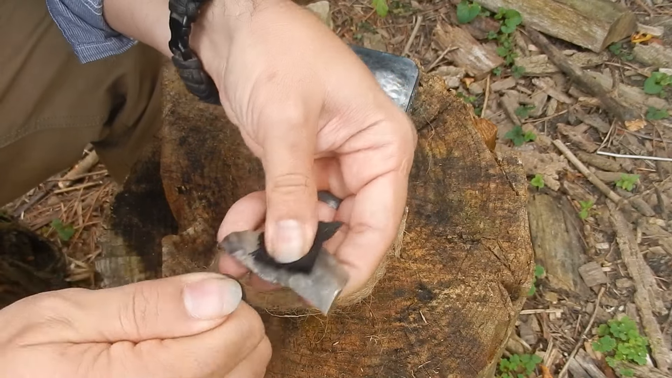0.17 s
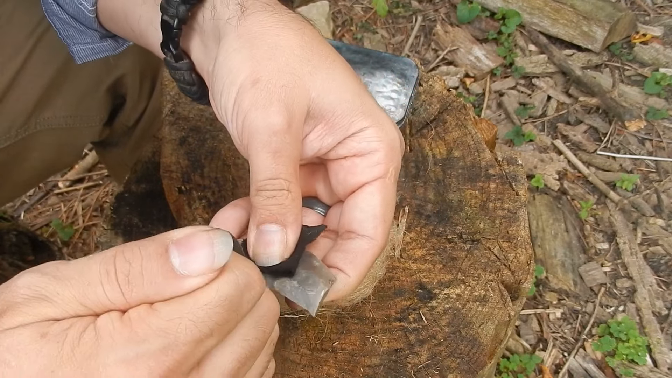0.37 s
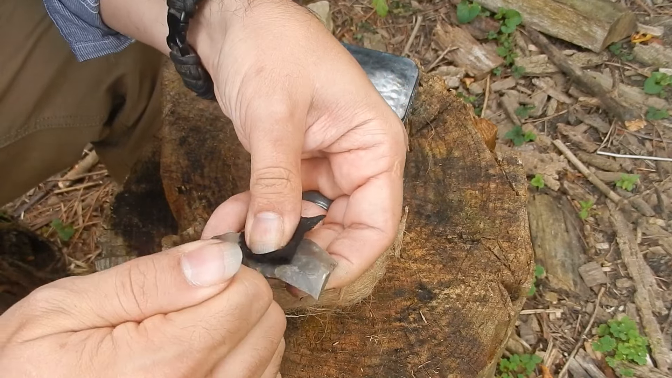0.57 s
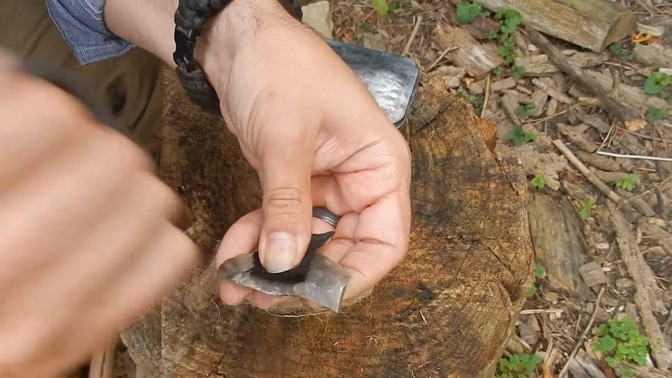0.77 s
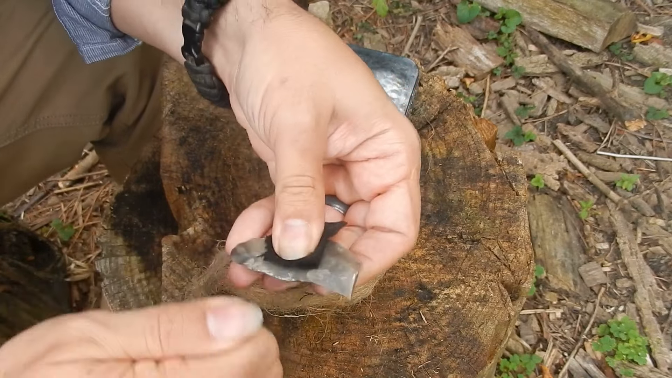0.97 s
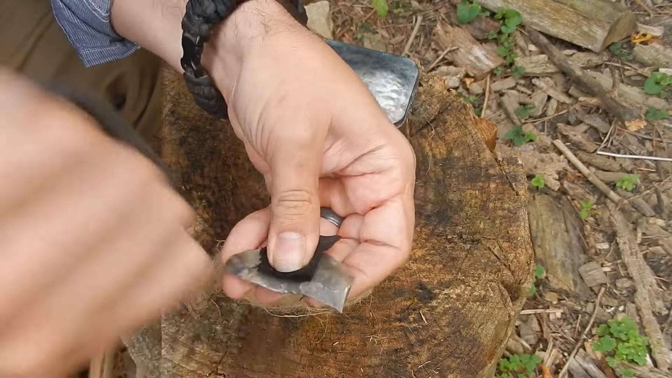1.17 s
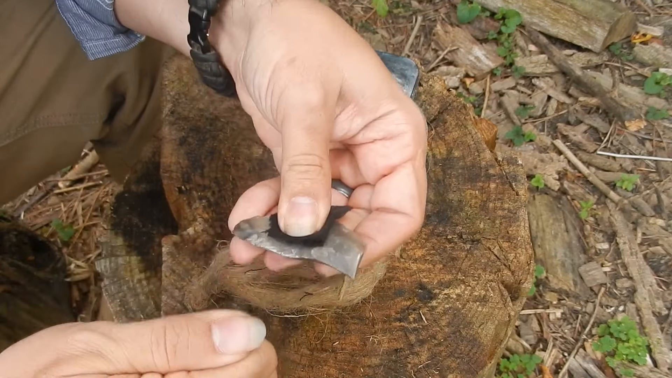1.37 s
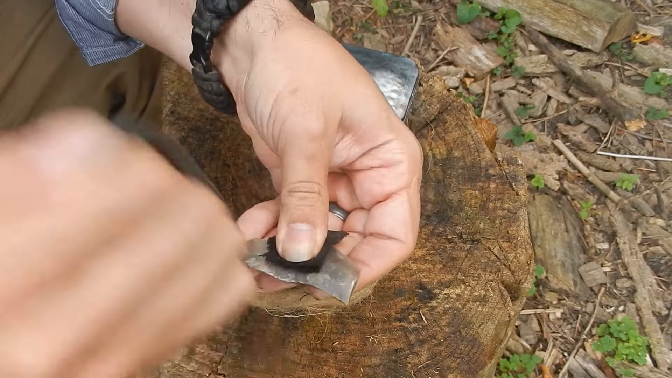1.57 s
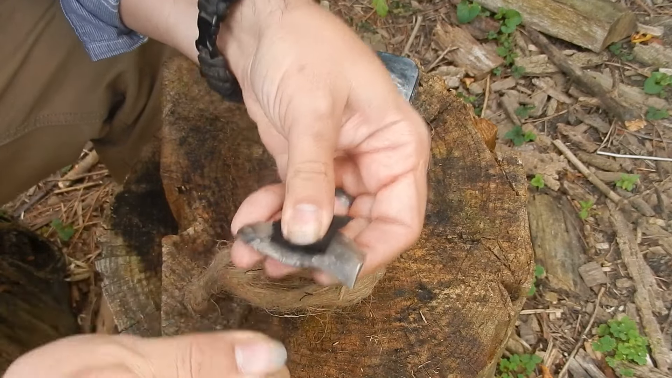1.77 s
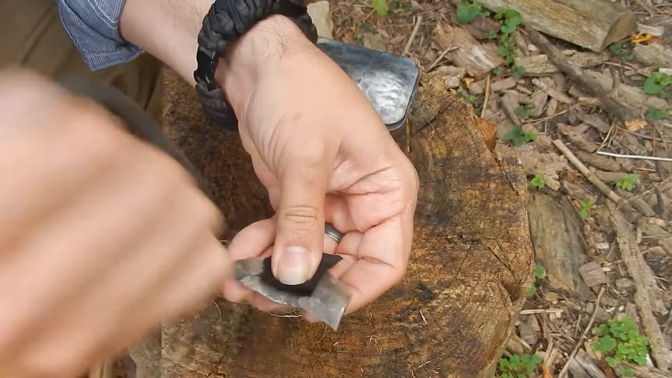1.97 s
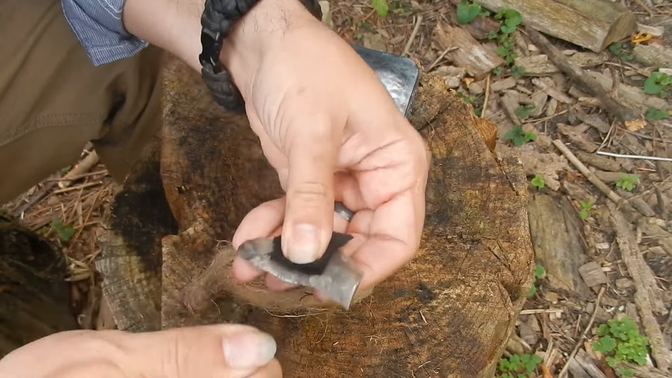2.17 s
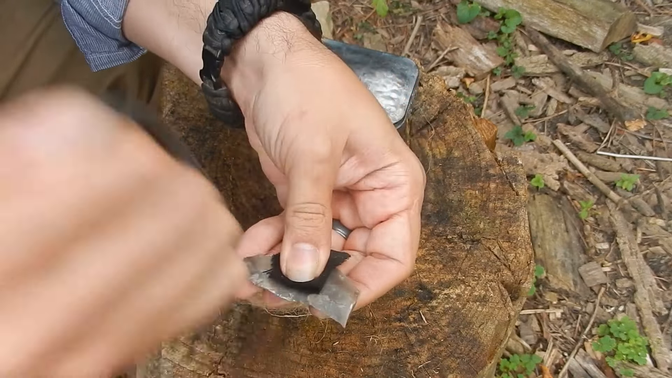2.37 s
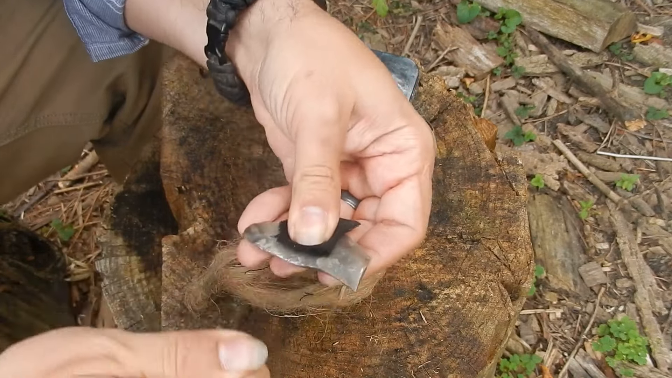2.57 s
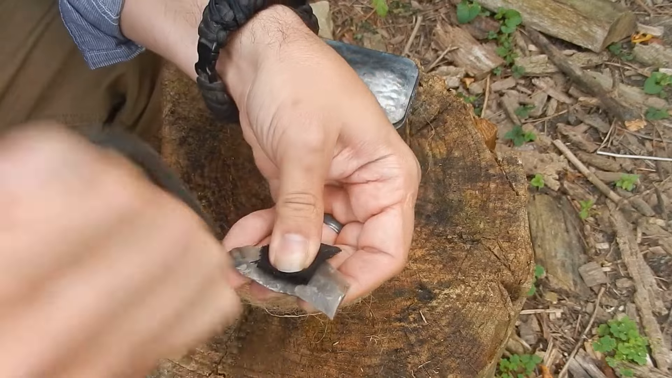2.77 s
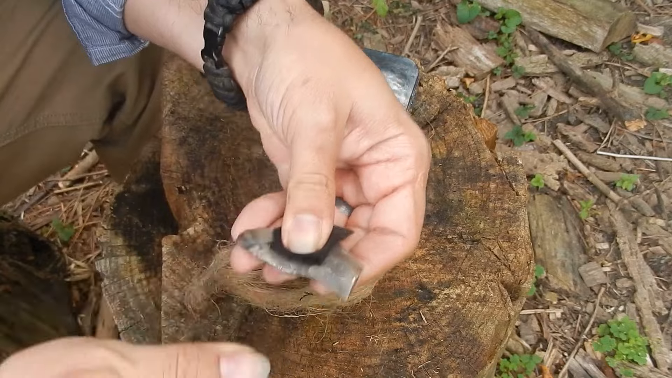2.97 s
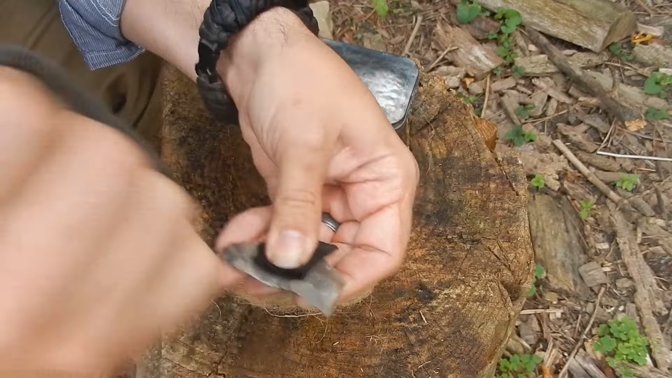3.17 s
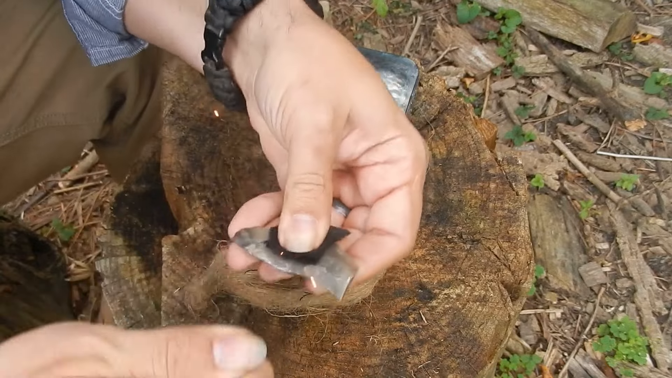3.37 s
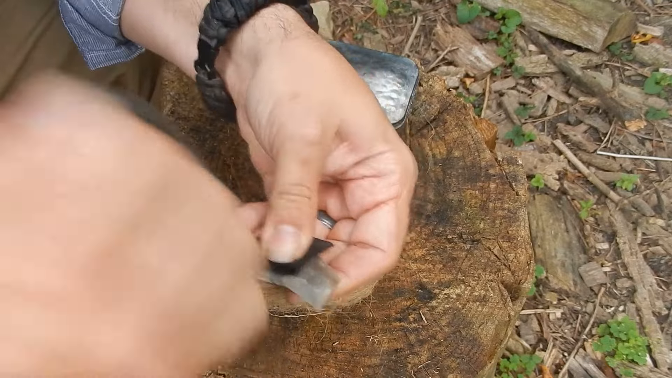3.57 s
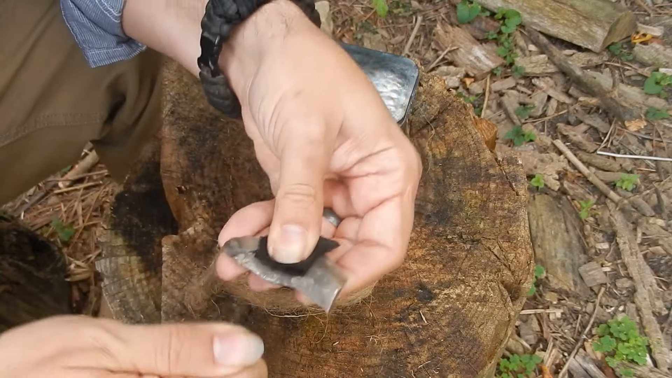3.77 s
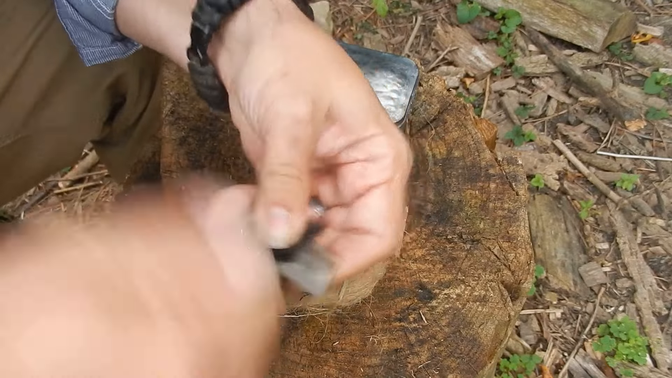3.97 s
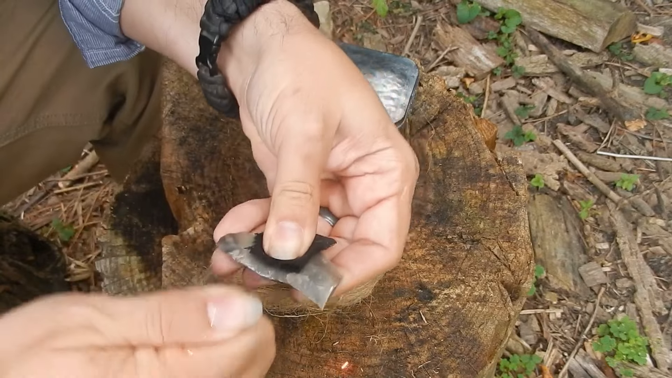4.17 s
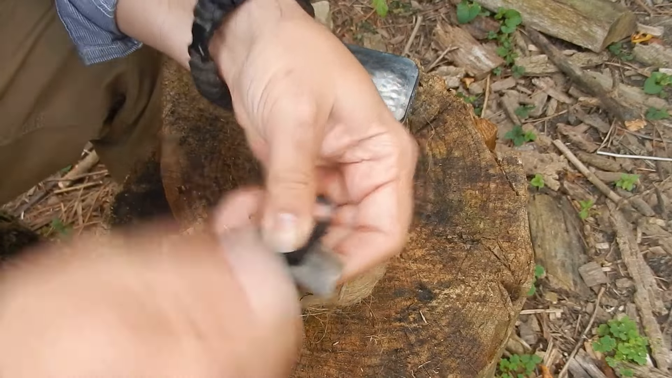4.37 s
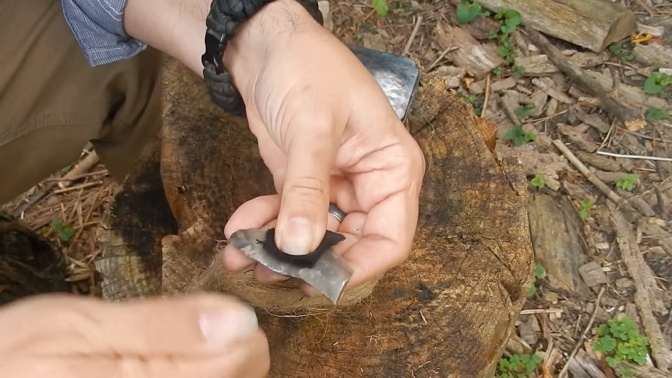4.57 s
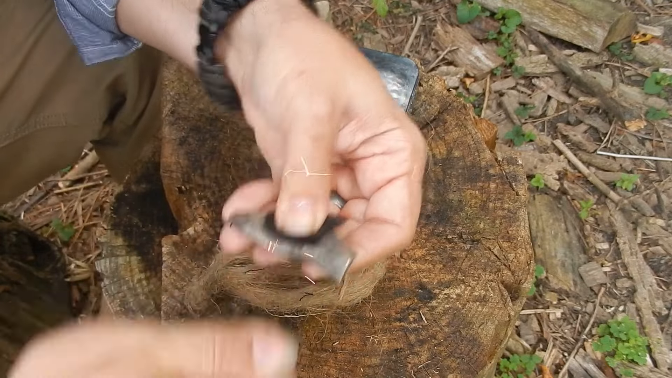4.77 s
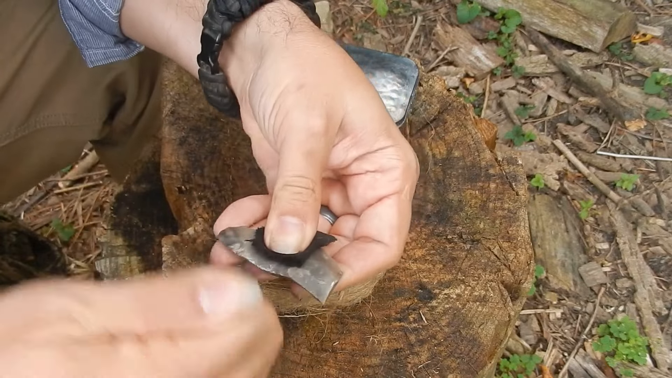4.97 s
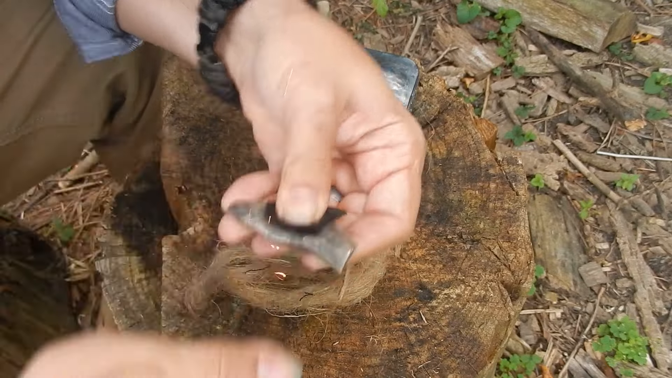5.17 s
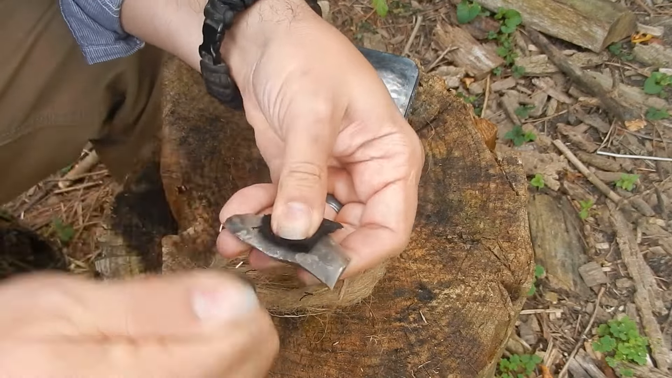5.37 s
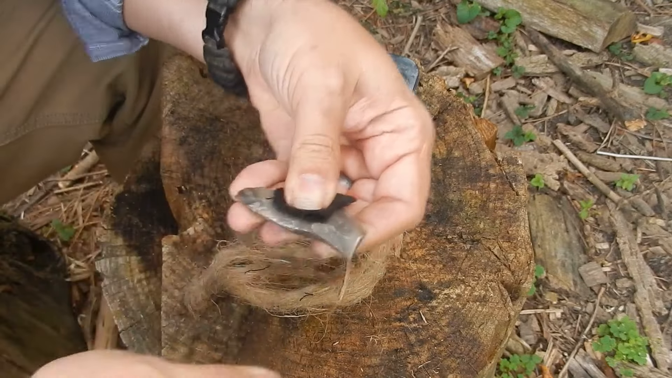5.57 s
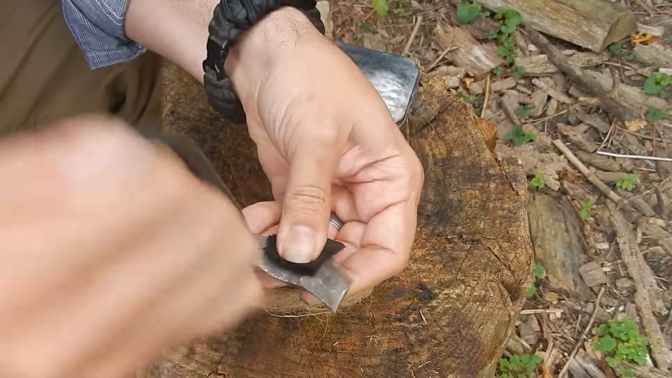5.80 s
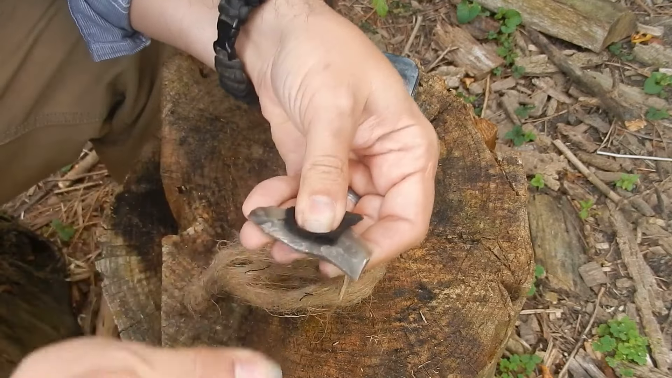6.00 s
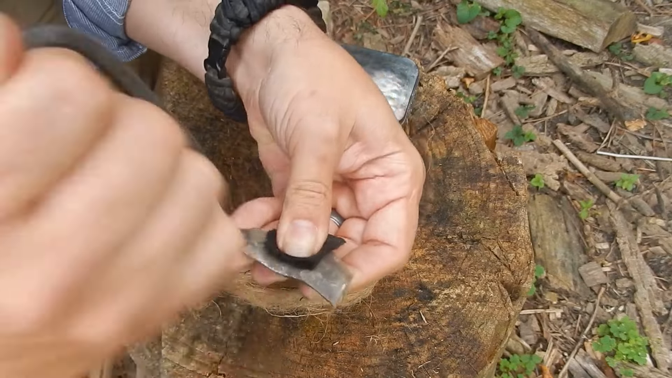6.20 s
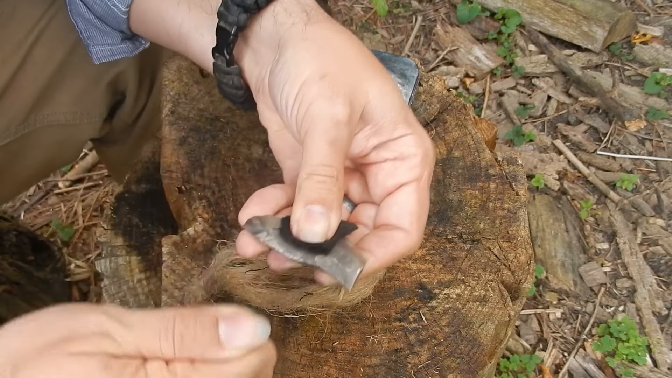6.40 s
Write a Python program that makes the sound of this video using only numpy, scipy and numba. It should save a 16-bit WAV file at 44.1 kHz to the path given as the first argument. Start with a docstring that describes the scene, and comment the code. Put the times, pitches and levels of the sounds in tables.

```python
"""A sharp, ringing scrape: steel glances off a hand-held flint, the first of sixteen blows outdoors.
Each blow is a brief force that excites the damped modes of steel and stone. Behind them the open air
hisses, a far engine drones and a small camera whines faintly; early on the steel taps lightly to aim.
The camera hears it all from just above: its gain control ducks at the blows and creeps back,
and its treble runs 10 ms behind its lower band."""
import sys
import numpy as np
from scipy import signal
from scipy.fft import rfft, irfft, next_fast_len
from scipy.io import wavfile
from scipy.ndimage import uniform_filter1d
from numba import njit

SR = 44100
rng = np.random.default_rng(int(sys.argv[2]) if len(sys.argv) > 2 else 0)


def dump_mix(stems):
    """Bounce the given channels to the path in sys.argv[1] as a 16-bit WAV at rate SR."""
    frames = np.atleast_2d(stems).T  # one column per channel
    limited = np.clip(frames, -1, 1)  # hard clip at full scale
    pcm = np.round(limited * 32767).astype(np.int16)
    wavfile.write(sys.argv[1], SR, pcm)


N = 283915
T = np.arange(N) / SR


def undb(db):
    """Decibels to amplitude ratio."""
    return 10 ** (np.asarray(db) / 20)


def level(x, db):
    """Normalisation to an rms level."""
    return x * undb(db) / np.sqrt(np.mean(x ** 2))


def unit(x):
    """Normalisation to unit energy."""
    return x / np.sqrt(np.sum(x ** 2))


def colour(x, points):
    """Zero-phase filtering by a curve of (frequency_hz, gain_db) points."""
    hz, db = np.transpose(points)
    size = next_fast_len(len(x))
    bins_hz = np.maximum(np.arange(size // 2 + 1) * SR / size, 1)
    gain = undb(np.interp(np.log(bins_hz), np.log(hz), db))
    return irfft(rfft(x, size) * gain, size)[:len(x)]


def drift(rate_hz):
    """Low-pass noise: random steps, smoothed twice, with a spread near 1."""
    hold = int(SR / rate_hz)
    steps = np.repeat(rng.standard_normal(N // hold + 1), hold)
    return uniform_filter1d(uniform_filter1d(steps, hold), hold)[:N]


def delay(x, lag_s):
    """Pure time delay of both channels."""
    return np.pad(x, ((0, 0), (int(lag_s * SR), 0)))[:, :N]


def pan(x, left_db):
    """Placement by level difference, left minus right."""
    return x * undb(np.array([[left_db], [-left_db]]) / 2)


def scrape(scrape_s, bite=1.5, drag_db=-12, drag_s=0.0052, rebound_db=-15, rebound_s=0.0055):
    """Contact friction: the edge bites, tears grains of steel, rebounds and drags off in gritty catches."""
    t = T[:SR // 16]
    tearing = unit(rng.standard_normal(len(t)) * np.exp(-t / scrape_s))
    catches = rng.standard_normal(len(t)) * rng.exponential(size=len(t)) ** 2
    force = tearing + undb(drag_db) * unit(catches * t * np.exp(-t / drag_s))
    force += undb(rebound_db) * np.roll(tearing, int(SR * rebound_s * rng.uniform(0.98, 1.9)))
    force[0] += bite * np.exp(-scrape_s / 0.0027)  # a short blow is nearly a single impact
    return force


def ring(force, modes):
    """Modal superposition: a force drives damped sinusoids of alternating sign; unit energy."""
    t = T[:len(force)]
    response = sum((-1) ** k * undb(db) * width * np.exp(-np.pi * width * t) * np.sin(2 * np.pi * hz * t)
                   for k, (hz, width, db) in enumerate(modes))
    return unit(signal.fftconvolve(force, response)[:len(force)])


def gripped(modes, lift_db, count):
    """Modal weighting: a looser grip lets the lowest modes sound more."""
    return [(hz, width, db + lift_db * (k < count)) for k, (hz, width, db) in enumerate(modes)]


def radiate(x, corner_hz):
    """Radiation efficiency: a small body sends out little below a corner frequency; unit energy."""
    return unit(signal.sosfilt(signal.butter(4, corner_hz, "high", fs=SR, output="sos"), x))


# modes of the steel, damped by the fist: frequency_hz, bandwidth_hz, gain_db
STEEL_MODES = [(1503, 360, -7), (1910, 351, 2), (2345, 277, 4.5), (2609, 324, 8.5), (3170, 830, -4.5)]

def steel_ring(force, grip_db, ring_db, ring_hz=3829, ring_width_hz=67):
    """Free vibration: the steel's broad modes die quickly, and one narrow mode rings on."""
    damped = radiate(ring(force, gripped(STEEL_MODES, grip_db, count=2)), corner_hz=950)
    return damped + undb(ring_db) * ring(force, [(ring_hz, ring_width_hz, 0)])


# modes of the flint, damped by the fingers: frequency_hz, bandwidth_hz, gain_db
FLINT_MODES = [(4167, 270, 1), (5180, 440, -7), (5980, 270, -4), (6798, 920, -3), (8270, 770, -10.5),
               (9360, 420, -10.5), (10900, 1600, -21.5), (13150, 550, -12)]

def flint_ring(force, grip_db, pitch_hz, width_hz=320):
    """Free vibration: the stone clinks in high modes, its main pitch shifting from blow to blow."""
    modes = gripped(FLINT_MODES, grip_db, count=1) + [(pitch_hz, width_hz, 0)]
    return radiate(ring(force, modes), corner_hz=3800)


# spectrum of tearing grains: frequency_hz, gain_db
CRACK_SPECTRUM = [(100, -22.5), (500, -28), (1500, -18), (3400, -15.5), (4400, 0.5), (5500, -1.5),
                  (6200, 2.5), (8700, -4), (10500, -10.5), (12000, -9.5), (13200, -7.5), (14500, -18.5),
                  (16000, -24.5)]
# blows, levels relative: start_s, level_db, flint_db, ring_db, grip_db, pitch_hz, scrape_s
BLOWS = [(0.0239, -8, -0.5, -3, 0, 5800, 0.0023), (0.8886, -6, -4, -8, 0.5, 5730, 0.0039),
         (1.2854, 1, -4.5, -6, -2, 6300, 0.0025), (1.6768, 0.5, 0, -14.5, -7.5, 6180, 0.0031),
         (2.0756, -4, 2.5, -14, -6.5, 6480, 0.0015), (2.502, -4.5, 0.5, -2.5, 1, 6500, 0.0017),
         (2.875, -5, 1, -7.5, -3, 6330, .0027), (3.2488, -5, -0.5, -9.5, 1, 6530, 0.0012),
         (3.6309, -7, -4, -17.5, -4.5, 6610, .002), (4.0114, -5.5, -2.5, -8.5, -5, 6600, 0.0012),
         (4.405, -8, 0, -8, 1.5, 6350, .0036), (4.7837, -2, -5, -7.5, 0, 6330, .0047),
         (5.1789, -9.5, 1.5, -2.5, 0.5, 6370, 0.0021), (5.5604, -6, -1, -12.5, 0.5, 6560, 0.0042),
         (5.9352, -7, -1, -3, -0.5, 6400, 0.0046), (6.2896, -9, 1, -5.5, -0.5, 6510, 0.0044)]
TEN_MS_GAIN = np.sqrt(.01 * SR)  # takes unit energy to unit rms over 10 ms

def strikes():
    """Impact excitation: each scrape rings both bodies and is also heard directly as a dry crack."""
    ringing, crack = np.zeros((2, N + SR))
    for start_s, level_db, flint_db, ring_db, grip_db, pitch_hz, scrape_s in BLOWS:
        force = scrape(scrape_s)
        steel = steel_ring(force, grip_db, ring_db)
        flint = flint_ring(force, grip_db, pitch_hz)
        gain = undb(level_db) * TEN_MS_GAIN
        i = int(start_s * SR)
        ringing[i:i + len(force)] += gain * (steel + undb(flint_db) * flint)
        crack[i:i + len(force)] += gain * undb(flint_db) * unit(force)
    return ringing[:N], colour(crack[:N], CRACK_SPECTRUM)


def scatter(x, near_db, near_t60_s, far_db, far_t60_s, spread=0.38):
    """Diffuse reflection: scatter from stump and body, then a thin tail from the trees."""
    t = T[:SR // 2]
    onset = 1 - np.exp(-t / 0.021)
    fade = lambda t60_s: unit(undb(-60 * t / t60_s) * onset * rng.standard_normal(len(t)))
    tail = lambda: undb(near_db) * fade(near_t60_s) + undb(far_db) * fade(far_t60_s)
    shared = tail()
    return np.array([signal.fftconvolve(x, shared + spread * tail())[:N] for _ in range(2)])


# spectra of the open air and its low rumble: frequency_hz, gain_db
AIR_SPECTRUM = [(180, -26), (300, -3), (433, -7.5), (511, -4.5), (574, -5), (749, -3.5), (1230, -3.5),
                (2210, -12.5), (2650, -14), (3350, -18), (4590, -5.5), (5520, -9.5), (6200, -2.5),
                (7820, -4.5), (16000, -48)]
RUMBLE_SPECTRUM = [(20, -33.5), (40, -13.5), (56, -1.5), (78, 1), (130, -1.5), (200, -14), (300, -27.5),
                   (500, -43.5)]

def open_air():
    """Partly coherent noise: hiss and rumble swell gently, mostly the same in both ears."""
    def layer(spectrum, db, side_db, swell_db):
        mid, side = (level(colour(rng.standard_normal(N), spectrum), db) for _ in range(2))
        return (mid + undb(side_db) * np.array([side, -side])) * undb(swell_db * drift(4.5))

    hiss = layer(AIR_SPECTRUM, db=-45, side_db=-9, swell_db=2.34)
    return hiss + layer(RUMBLE_SPECTRUM, db=-40.5, side_db=-8.5, swell_db=2.5)


# the engine's slowly sagging speed: time_s, firing_hz
ENGINE_SPEED = [(0, 58), (1.3, 55.6), (2.6, 54.3), (4.7, 54.8), (5.3, 52.4), (5.7, 52.2), (5.9, 50.4),
                (6.44, 49.7)]
# swell and fade of its drone: time_s, level_db
ENGINE_SWELL = [(0, -38.5), (.25, -42.5), (.55, -33.5), (.75, -39), (1.15, -27.5), (1.6, -28), (1.8, -36.5),
                (2.4, -28), (2.72, -35.5), (3.05, -24), (3.25, -39.5), (3.55, -25), (4.25, -36),
                (4.45, -24.5), (4.95, -37), (5.45, -36), (5.9, -41), (6.4, -28.5)]
# harmonics that carry: multiple, gain_db, swell_share, waver_db
ENGINE_HARMONICS = [(2, 2, 1, 2), (3, -14.5, .7, 7), (4, -28, .8, 4.5), (5, -33, .5, 1)]
# exhaust resonances: centre_hz, half_width_hz, lift_db
EXHAUST_RESONANCES = [(202, 4, 25), (219.5, 1.5, 12)]

def engine(wobble=0.013, usual_db=-28):
    """Forced resonance: harmonics of a far engine's firing boom as they slide into the exhaust's modes."""
    firing_hz = np.interp(T, *np.transpose(ENGINE_SPEED))
    swell_db = np.interp(T, *np.transpose(ENGINE_SWELL)) - usual_db
    phase = 2 * np.pi * np.cumsum(firing_hz * (1 + wobble * drift(20))) / SR
    drone = np.zeros(N)
    for multiple, gain_db, swell_share, waver_db in ENGINE_HARMONICS:
        boom_db = sum(lift_db / (1 + ((multiple * firing_hz - centre_hz) / half_width_hz) ** 2)
                      for centre_hz, half_width_hz, lift_db in EXHAUST_RESONANCES)
        level_db = usual_db + gain_db + swell_share * swell_db + boom_db + waver_db * drift(16)
        drone += undb(level_db) * np.sin(multiple * phase)
    return np.sqrt(2) * drone


# rise of the thin top hiss: time_s, level_db
SIZZLE_RISE = [(0, -68), (1.5, -64.5), (3.5, -63.5), (5, -58.5), (6.44, -52.5)]

def sizzle(flicker_db=3):
    """Amplitude-modulated noise: a thin, high hiss flickers as it grows."""
    hiss = level(colour(rng.standard_normal(N), [(2000, -16), (8000, -2.5), (12000, -1), (15000, 0)]), 0)
    return hiss * undb(np.interp(T, *np.transpose(SIZZLE_RISE)) + flicker_db * drift(37))


def whine(pitch_hz=6018, level_db=-49, waver_db=5, start_s=-.008, period_s=.1981, burst_s=.056):
    """A gated pure tone: the camera's electronics sing unevenly, five bursts a second."""
    gate = uniform_filter1d(1. * ((T - start_s) % period_s < burst_s), size=700)
    tone = np.sqrt(2) * np.sin(2 * np.pi * pitch_hz * T)
    return undb(level_db + waver_db * drift(25)) * gate * tone


# steel touching flint while taking aim, levels relative: start_s, level_db, tick_db
TOUCHES = [(0.3671, -45, 11), (0.46, -42, -17), (0.509, -44.5, -3), (0.627, -63, -17.5),
           (0.682, -46.5, -13)]

def touches(ping_hz=2680, ping_width_hz=170, scrape_s=0.00047):
    """Light impacts: each excites a ping in the steel's main mode and a tick from both bodies."""
    taps = np.zeros(N)
    for start_s, level_db, tick_db in TOUCHES:
        force = scrape(scrape_s)
        ping = ring(force, [(ping_hz, ping_width_hz, 0)])
        tick = unit(ring(force, STEEL_MODES) + .5 * ring(force, FLINT_MODES[:3]))
        i = int(start_s * SR)
        taps[i:i + len(force)] += undb(level_db) * TEN_MS_GAIN * (ping + undb(tick_db) * tick)
    return taps


# balance of the blows between the microphone ports: frequency_hz, left_minus_right_db
PORT_BALANCE = [(500, 0.5), (1300, 6.5), (2400, -1), (4400, 8), (6000, 3.5), (8000, 3), (13000, 0.5)]

def ports(x, bounce_db=-13, bounce_s=.0004):
    """Comb filtering: a bounce off the camera body ripples two differently coloured ports oppositely."""
    rippled = x + np.array([[1], [-1]]) * undb(bounce_db) * delay(x, bounce_s)
    return np.array([colour(ear, [(hz, side * db / 2) for hz, db in PORT_BALANCE])
                     for ear, side in zip(rippled, (1, -1))])


def scene(crack_db=-7):
    """Superposition: blows a little to the left; cupped hands hold in the ringing more than the crack."""
    ringing, crack = strikes()
    ringing = ringing + touches()
    scattered = scatter(ringing, near_db=-31, near_t60_s=.06, far_db=-33.5, far_t60_s=.2)
    scattered += scatter(crack, near_db=-15, near_t60_s=.11, far_db=-18, far_t60_s=.17)
    background = open_air() + engine() + sizzle() + whine()
    return ports(ringing + undb(crack_db) * crack + scattered) + pan(background, left_db=1.5)


@njit
def gain_control(x, threshold_db, window_s, attack_s, release_db_per_s):
    """Compression: the cut in dB rises quickly with short-term power and lets go at a steady rate."""
    cuts_db = np.empty(len(x))
    power, held_db, cut_db = 0., 12., 12.  # starts already turned down
    for i in range(len(x)):
        power += (x[i] ** 2 - power) / (window_s * SR)
        excess_db = 10 * np.log10(power + 1e-18) - threshold_db
        held_db = max(held_db - release_db_per_s / SR, excess_db, 0.)
        cut_db += (held_db - cut_db) / (attack_s * SR)
        cuts_db[i] = cut_db
    return cuts_db


def split_bands(x, split_hz=4060, lag_s=.01025, smear_db=-22, leak_db=-24, skew=0.13):
    """Group delay: the treble comes late, and the lower band is smeared a little in time."""
    lowpass = signal.firwin(numtaps=201, cutoff=split_hz, fs=SR)
    low = signal.fftconvolve(x, lowpass[None], "same", axes=1)
    smear = undb(smear_db) * unit(rng.standard_normal(2 * int(lag_s * SR)))
    smeared = signal.fftconvolve(low, smear[None], "same", axes=1)
    late = delay(x - low + undb(leak_db) * low, lag_s)
    thump = skew * late ** 2  # a lopsided wave adds low frequencies
    return low + smeared + late + thump


def record(dry, top_hz=15900):
    """The camera's signal chain: compression, soft clipping, two bands out of step and a band limit."""
    cut_db = gain_control(dry.mean(axis=0), threshold_db=-23.0, window_s=0.013,
                          attack_s=0.0031, release_db_per_s=15.5)
    rounded = np.tanh(dry * undb(-cut_db))
    microphone_top = [(9500, -0.5), (11800, 1.5), (13300, -0.5), (14300, -3), (16000, -1.5)]
    coloured = np.array([colour(ear, microphone_top) for ear in split_bands(rounded)])
    return signal.sosfiltfilt(signal.ellip(8, .1, 60, top_hz, fs=SR, output="sos"), coloured)


dry = scene()
out = record(dry)
dump_mix(out)
```